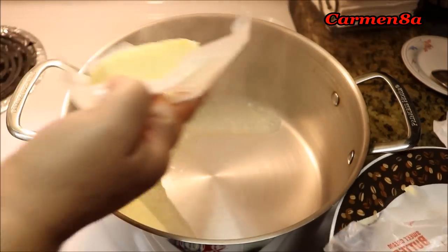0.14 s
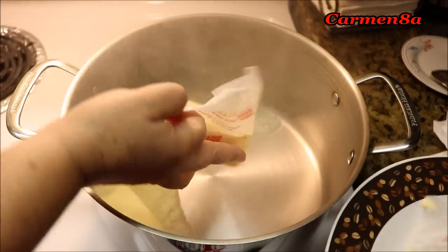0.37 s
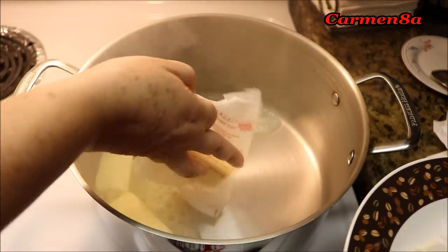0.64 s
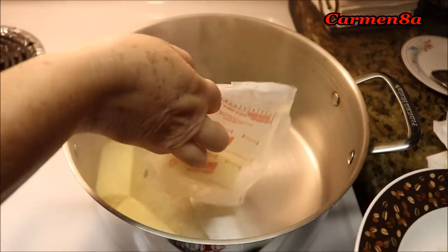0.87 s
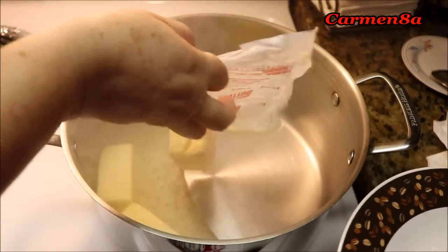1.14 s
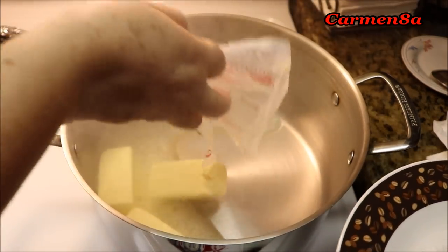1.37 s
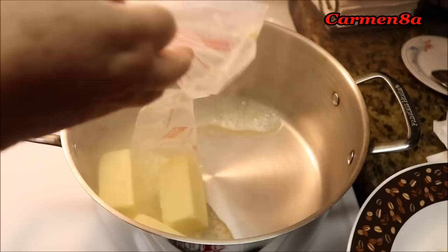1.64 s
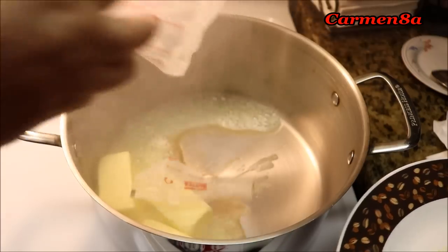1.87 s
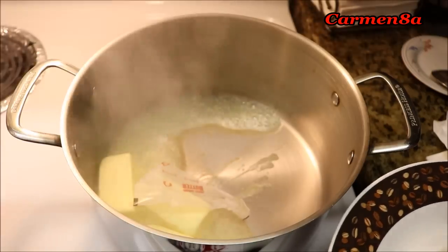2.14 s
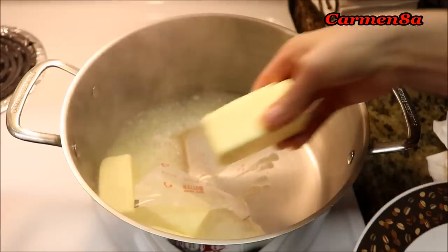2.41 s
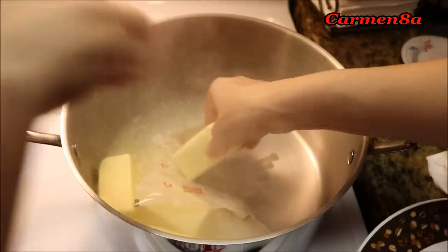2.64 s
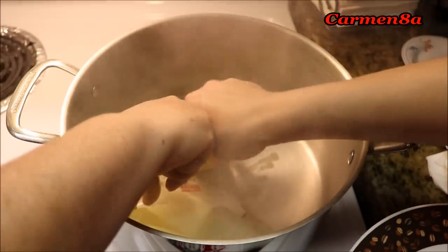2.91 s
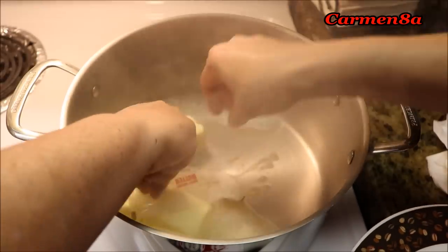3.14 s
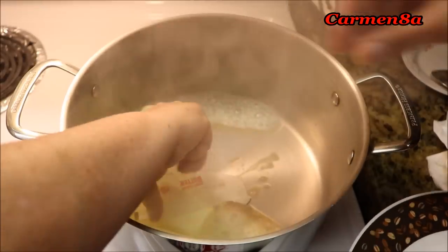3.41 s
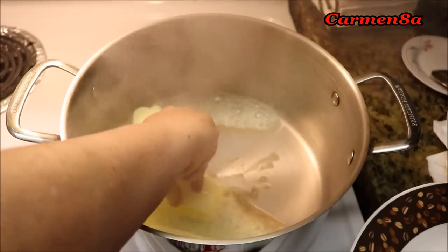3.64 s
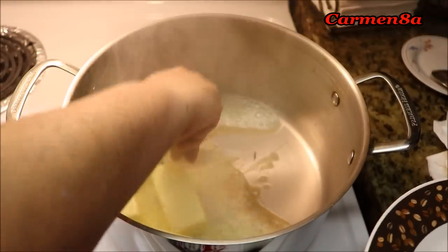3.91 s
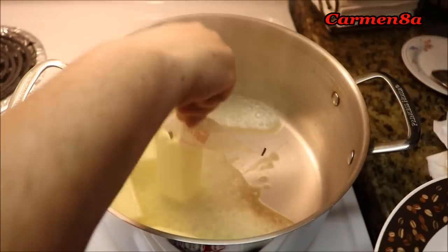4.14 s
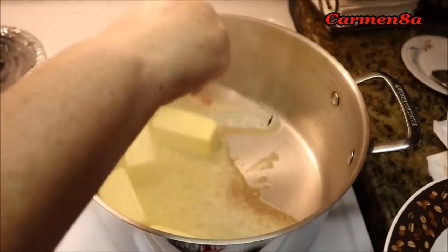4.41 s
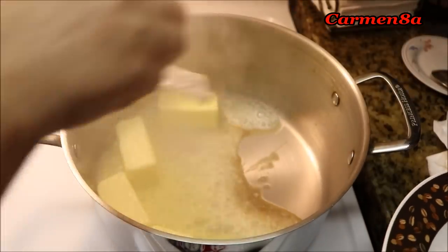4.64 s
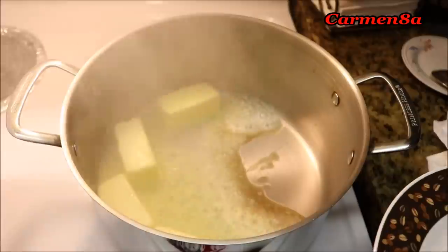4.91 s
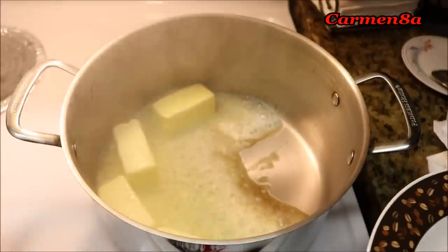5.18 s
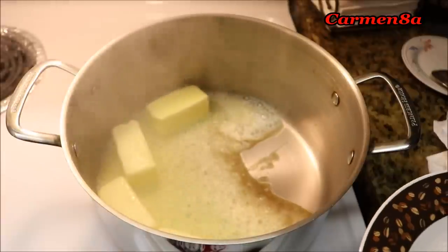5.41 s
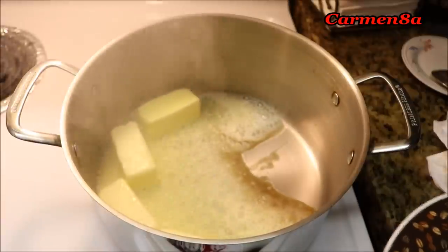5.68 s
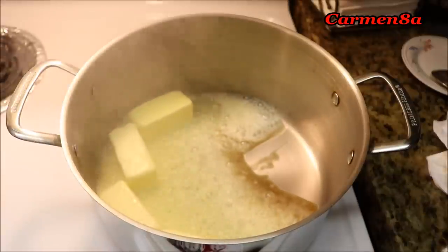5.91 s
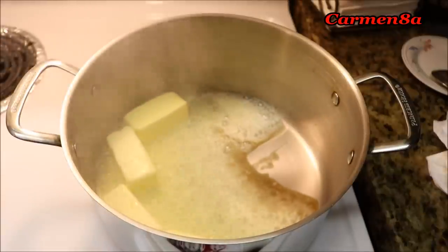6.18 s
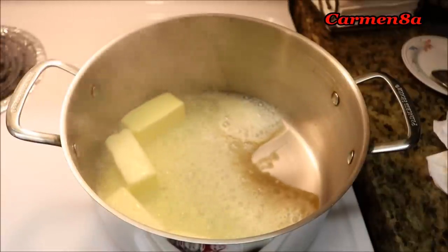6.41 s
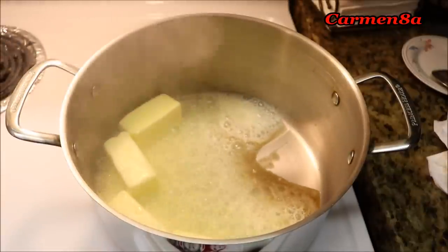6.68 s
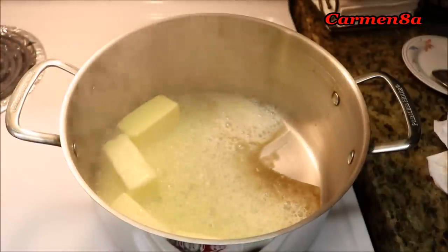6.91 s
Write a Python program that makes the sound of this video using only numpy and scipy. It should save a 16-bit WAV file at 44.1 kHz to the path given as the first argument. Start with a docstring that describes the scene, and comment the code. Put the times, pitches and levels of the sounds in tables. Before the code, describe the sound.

Close, dense frying hiss with crackling bubbles in a hollow metal pot, broken by a soft thump, a heavier clunk and sharp fat spits.

```python
"""At a stove, butter melts in a hot steel pot: steam spits in a high fizz (patchy noise bursts) over bubbling froth.
The froth makes the hollow pot hum and its walls ring faintly; bubbles, spits and contact cracks are short notes.
Sticks of butter and a hand bump the pot, which rings as a sum of decaying modes with a short reverberation.
Air stirs at the microphone as low noise; a gain control ducks the loudest thud."""
import sys
import numpy as np
from scipy import signal
from scipy.fft import rfft, irfft, next_fast_len
from scipy.io import wavfile
from scipy.ndimage import uniform_filter1d, minimum_filter1d, map_coordinates

SR = 44100
rng = np.random.default_rng(int(sys.argv[2]) if len(sys.argv) > 2 else 0)


def transcribe(signal):
    """Save signal, clipped to [-1, 1], as a 16-bit WAV file at the path in sys.argv[1]."""
    frames = np.atleast_2d(signal).T
    limited = np.clip(frames, -1, 1)
    pcm = np.round(limited * 32767).astype(np.int16)
    wavfile.write(sys.argv[1], SR, pcm)


def natural_amplitude(level_db):
    """Convert a level in decibels to a linear amplitude factor, elementwise."""
    exponent = np.asarray(level_db, float) / 20
    return 10 ** exponent


N = 310905


def unit(x):
    """Scale to rms 1."""
    return x / np.sqrt(np.mean(x ** 2) + 1e-20)


def along(points, hz):
    """Read (f/Hz, value) points on a log frequency axis."""
    f, v = np.transpose(points)
    return np.interp(np.log(hz + 1), np.log(f + 1), v)


def spectrum(points):
    """Amplitude response through (f/Hz, level/dB) points."""
    return lambda hz: natural_amplitude(along(points, hz))


def curves(rows):
    """One value per sample for each column after the time."""
    s, *cols = np.transpose(rows)
    return [np.interp(np.arange(N) / SR, s, c) for c in cols]


def wobble(rate_hz):
    """Smooth random curve, rate_hz knots a second."""
    knots = rng.standard_normal(int(N * rate_hz / SR) + 4)
    return map_coordinates(knots, [np.arange(N) * rate_hz / SR])


def swells(rows):
    """Sum of bell-shaped swells (t/s, height, rise/s, fall/s)."""
    t = np.arange(N) / SR
    return sum(height * np.exp(-((t - s) / np.where(t < s, rise, fall)) ** 2) for s, height, rise, fall in rows)


def filtered(x, response):
    """x times a response of frequency."""
    m = next_fast_len(N + SR // 5)
    return irfft(rfft(x, m) * response(np.fft.rfftfreq(m, 1 / SR)), m)[..., :N]


def highpass(hz, corner_hz, order):
    """Smooth low cut, zero phase."""
    return 1 / (1 + (corner_hz / (hz + 1)) ** order)


def resonances(modes):
    """Response of (f/Hz, width/Hz, level/dB) resonances; they cancel between neighbours."""
    return lambda f: sum(natural_amplitude(db) * 1j * f * w / (c * c - f * f + 1j * f * w) for c, w, db in modes)


def sides(db):
    """Left and right gains for a left-right difference."""
    return natural_amplitude(np.array([db / 2, -db / 2]))


# stereo likeness of the noise: f/Hz, left-right correlation/0-1
LIKENESS = [(40, 0.9), (150, 0.67), (380, 0.66), (600, 0.72), (950, 0.57), (2380, 0.51), (5980, 0.26),
            (15000, 0)]


def bursts(gain, scatter_db, patchy_db, size=256):
    """Stereo crowd of uneven tiny bursts at rms 1; a larger size makes its patches narrower and longer."""
    crowd = rng.standard_normal((2, N)) * natural_amplitude(scatter_db * rng.standard_normal(N))
    z = signal.stft(crowd, nperseg=size)[2]
    field = uniform_filter1d(rng.standard_normal(z.shape[1:]), size=5, axis=0)
    field = uniform_filter1d(field, size=8, axis=1)
    pair = signal.istft(z * natural_amplitude(patchy_db * unit(field)), nperseg=size)[1][:, :N]

    def mid_side(hz):
        turn = np.arccos(np.clip(along(LIKENESS, hz), 0, 1)) / 2
        return gain(hz) * np.array([np.cos(turn), np.sin(turn)])
    mid, side = filtered(pair, mid_side)
    return unit(np.array([mid + side, mid - side]))


CLIMB = 0.098  # share of the pitch gained by the envelope peak


def burst(hz, peak_cycles, t):
    """A short note: soft start, envelope peak 1 after peak_cycles, quick death, pitch climbing at first."""
    u = hz * t / np.maximum(peak_cycles, .5)
    phase = 2 * np.pi * hz * t * (1 + CLIMB * np.minimum(u, 2) / 2)
    return np.sin(phase) * u * np.exp(1 - u)


# hands and paper fan air at the microphone: t/s, level/dB, rise/s, fall/s
AIR_PUFFS = [(.08, -65, .08, 0.041), (.55, -65, 0.35, 0.54), (1.38, -57.5, 0.05, 0.23),
             (1.9, -67, 0.056, .05), (2.4, -64, 0.44, 0.16), (2.7, -61, .05, 0.11),
             (2.92, -50, 0.028, 0.067), (3.12, -61, 0.16, 0.14), (3.6, -57, 0.095, 0.21),
             (4.16, -69, 0.046, .04), (4.38, -54, 0.071, 0.23), (6.05, -64, 0.11, 0.16),
             (6.85, -69, 0.11, 0.23)]
STILL_AIR_DB = -77


def draught():
    """Amplitude of the moving air: a still floor plus puffs."""
    return natural_amplitude(STILL_AIR_DB) + swells([(s, natural_amplitude(db), rise, fall) for s, db, rise, fall in AIR_PUFFS])


# spectrum of moving air: f/Hz, level/dB
AIR_SPECTRUM = [(15, -34), (30, -20), (45, -11), (65, -9.5), (90, -13.5), (130, -44), (300, -90)]


def air():
    """Slow turbulence at the microphone: very low noise that follows the draught."""
    noise = bursts(spectrum(AIR_SPECTRUM), 1.0, patchy_db=2.0, size=4096)
    return draught() * natural_amplitude(3.7 * wobble(8)) * noise


# spectrum of the rumble: f/Hz, level/dB
RUMBLE_SPECTRUM = [(30, -60), (60, -20), (100, 2.5), (170, 3), (210, -23), (300, -5), (420, -3.5),
                   (600, -37), (1200, -90)]
RUMBLE_DB, RUMBLE_CHILLS_DB_PER_DB, RUMBLE_STIRRED = -63.5, 2.1, 0.9
RUMBLE_GROWS_DB, RUMBLE_GROWS_S = 2.5, 1.1  # weaker at first


def rumble():
    """Low noise that weakens as the froth chills and rises with the draught."""
    t = np.arange(N) / SR
    shy_db = RUMBLE_GROWS_DB / (1 + np.exp((t - RUMBLE_GROWS_S) / 0.16))
    level = natural_amplitude(RUMBLE_DB - RUMBLE_CHILLS_DB_PER_DB * swells(BUTTER_CHILLS) - shy_db)
    level = level + RUMBLE_STIRRED * draught()
    return level * natural_amplitude(5.5 * wobble(8.1)) * bursts(spectrum(RUMBLE_SPECTRUM), 0.56, patchy_db=-2.3, size=4096)


BASE_HZ, BASE_WIDTH_HZ, BASE_DB = 235.4, 9, -59
BASE_DAMPED_S, BASE_DAMPED_DB = 3.6, 28


def base_drone():
    """The pot's base drones as one narrow resonance until butter is pressed onto it."""
    t = np.arange(N) / SR
    damped_db = BASE_DAMPED_DB / (1 + np.exp((BASE_DAMPED_S - t) / .1))
    base_db = BASE_DB - damped_db + 4.1 * wobble(4.52)
    return natural_amplitude(base_db) * bursts(resonances([(BASE_HZ, BASE_WIDTH_HZ, 0)]), 0.62, patchy_db=0.0, size=4096)


WALL_DB, WALL_DAMPED_DB_PER_S = -47, 1.3


def wall_ring():
    """Bubbling keeps the longer pot modes faintly ringing; the spreading fat damps the walls."""
    wall_db = WALL_DB - WALL_DAMPED_DB_PER_S * np.arange(N) / SR
    modes = [(hz, np.log(1000) / np.pi / t60, db) for hz, db, t60 in POT_MODES if t60 > .18]  # width from t60
    return natural_amplitude(wall_db) * bursts(resonances(modes), 0.92, patchy_db=3.0, size=2048)


# air inside the pot and its damped base: f/Hz, width/Hz, level/dB
POT_HOLLOW = [(358, 620, -4.5), (469, 17, -0.5), (570, 23, -4), (929, 120, 1.5), (1337, 256, 3)]
HUM_DB, HUM_UPPER_DB = -39.5, 2
HUM_FLARES_DB_PER_DB, HUM_CHILLS_DB_PER_DB, UPPER_FROTH_DB_PER_DB = 0.83, 1.04, 0.32


def hum():
    """Bubbling shakes the hollow pot: noise through its resonances, the upper ones following the froth."""
    hum_db = HUM_DB + HUM_FLARES_DB_PER_DB * swells(STEEL_FLARES) - HUM_CHILLS_DB_PER_DB * swells(BUTTER_CHILLS)
    froth_db = curves(MELT_COURSE)[0]
    upper_db = HUM_UPPER_DB + UPPER_FROTH_DB_PER_DB * (froth_db - froth_db.mean())

    def hollow(hz):
        lowpass = 1 / (1 + (hz / 1500) ** 4)
        return resonances(POT_HOLLOW)(hz) * lowpass * highpass(hz, 260, 4) * highpass(hz, 90, 4)
    pot = natural_amplitude(hum_db + 1.28 * wobble(8)) * bursts(hollow, 2.7, patchy_db=1.85, size=1024)
    return pot + (natural_amplitude(upper_db) - 1) * filtered(pot, lambda hz: highpass(hz, 720, 8))


# pot modes: f/Hz, level/dB, t60/s
POT_MODES = [(150, 1, .06), (232, -7, .8), (275, 0, .05), (362, -19, 1.5), (470, -1, .09), (520, 1, .09),
             (576, -1, .3), (598, -8, .25), (727, -30, .3), (911, 0, 1.4), (935, -14, .15), (1000, 4, .1),
             (1314, -3, .3), (1370, 2, .65), (1602, -2, .28), (1982, -4, .4)]
# bumps: t/s, level/dB, favoured f/Hz, spread/octaves, t60/s left by what rests on the pot
POT_BUMPS = [(.021, -26, 1310, 0.56, 1.5), (0.1365, -24.5, 1060, 0.77, 1.7), (1.783, -8, 570, 0.032, 0.1),
             (1.838, -16.5, 578, 0.058, 0.1), (2.902, -7.5, 444, 0.6, 0.73),
             (2.9095, 1.5, 530, 0.225, 0.061), (2.939, -24, 590, 0.11, .1), (2.9575, -9, 600, 0.1, 0.12),
             (3.516, -17, 463, 0.11, 0.38), (3.735, -29, 575, 0.12, 0.34), (4.428, -28, 1200, 1.7, .05),
             (4.44, -23, 475, 0.45, 0.1)]
RISE_S, SOFTER = 0.0017, 0.59  # rise at one octave of spread, exponent
CRACK_DB, CRACK_T60_S = -2, .03  # at one octave of spread, against the bump
STOPPED_S, STOP_S = 0.3, 0.013


def bumps():
    """Each contact rings the modes near its favoured pitch: soft butter low, a knuckle high; softer rises slower."""
    out, t = np.zeros((2, N + SR)), np.arange(SR // 2) / SR
    for s, db, hz, octaves, held_t60 in POT_BUMPS:
        rise_s = RISE_S / octaves ** SOFTER
        ring = np.zeros(len(t))
        for mode_hz, level_db, t60 in POT_MODES:
            favour_db = -8 * (np.log2(mode_hz / hz) / octaves) ** 2
            ring += natural_amplitude(level_db + favour_db - 60 * t / t60) * np.sin(2 * np.pi * mode_hz * t)
        crack = octaves * natural_amplitude(CRACK_DB - 60 * t / CRACK_T60_S) * rng.standard_normal(len(t))
        blow = natural_amplitude(db - 60 * t / held_t60) * (ring + crack) * (1 - np.exp(-t / rise_s)) ** 2
        pan = sides(-2.4 * np.log2(hz / 520))[:, None]  # high contacts favour the right
        out[:, round(s * SR):][:, :len(t)] += blow * pan
    t = np.arange(N) / SR
    stopped = np.exp(-np.maximum(t - STOPPED_S, 0) / STOP_S) + (t > 1)  # a hand on the rim stops the opening ring
    return out[:, :N] * stopped


# spits of fat, and the crack of contacts as the pot is bumped: t/s, envelope peak/dB, f/Hz, time to peak/cycles
SHARP_BURSTS = [(1.3095, -21, 3300, 12), (2.9025, -14, 6000, 1), (2.9562, -21, 6600, 4),
                (3.343, -1.5, 9200, 0.79), (3.354, -15, 9500, 3), (3.4945, -14, 11500, 4),
                (4.404, -24, 2580, 3), (4.429, -25, 1350, 3), (4.43, -19, 2700, 3),
                (4.4345, -21, 1800, 2.8), (4.454, -20, 5760, 9.5), (4.908, -23, 2600, 4),
                (5.502, -20, 9000, 2), (5.515, -23, 7000, 3.6), (5.837, -17, 7460, 10),
                (6.472, -17, 7700, 4)]


def sharp_bursts():
    """Sharp short bursts, each a climbing note: spits of fat, and the crack of contacts as the pot is bumped."""
    out, t = np.zeros(N), np.arange(1000) / SR
    for s, db, hz, cycles in SHARP_BURSTS:
        out[round(s * SR):][:len(t)] += natural_amplitude(db) * burst(hz, cycles, t)
    return out * sides(-1.5)[:, None]


def kitchen(x):
    """Short reverberation: decaying noise, different in each channel."""
    t = np.arange(SR // 4) / SR
    tail = rng.standard_normal((2, len(t))) * natural_amplitude(-60 * t / 0.31)
    return signal.fftconvolve(x, tail / np.linalg.norm(tail[0]), axes=1)[:, :N]


# bubbles out of the froth: rate/Hz, middle f/Hz, spread/octaves, time to peak/cycles, top level/dB, size range/dB
POP_KINDS = [(300, 2600, .3, 4, -30, 10), (330, 8000, .3, 2, -29, 12)]


def pops():
    """Scattered bubbles, each with its own pitch, size and place; low ones follow the froth, high ones the flares."""
    out, k = np.zeros((2, N + 512)), np.arange(512)
    froth_db, _, pan_db = curves(MELT_COURSE)
    drives_db = [froth_db - froth_db.mean(), swells(STEEL_FLARES)]
    for (rate, hz, octaves, cycles, db, range_db), drive_db in zip(POP_KINDS, drives_db):
        when, size = rng.random((2, 2400))[:, :int(rate * N / SR)]
        pitch, place = rng.standard_normal((2, 2400))[:, :len(when)]
        start = (when * N).astype(int)
        level = natural_amplitude(db + drive_db[start] - range_db * size)
        note_hz = np.minimum(hz * 2 ** (octaves * pitch), 13000)
        notes = level[:, None] * burst(note_hz[:, None], cycles, k / SR)
        index = (start[:, None] + k).ravel()
        for channel, gain in enumerate(sides(pan_db[start] + 4 * place)):
            out[channel] += np.bincount(index, (gain[:, None] * notes).ravel(), N + 512)
    return out[:, :N]


# bubble spectra: f/Hz, level/dB
SMALL_BUBBLES = [(300, -94), (900, -16), (1500, -10.5), (2400, -3), (3300, 1.5), (4200, -2), (5000, -14),
                 (6500, -42)]
LARGE_BUBBLES = [(250, -90), (700, -43), (1100, -22.5), (1500, -4), (1900, 0), (2100, 3.5), (2300, 0.5),
                 (2500, -2), (2850, 0), (3600, -14.5), (5000, -52)]
SMALL_DB, SMALL_FLARES_DB_PER_DB = -28, 0.18


def froth(surge):
    """Small and large bubbles as two bands of noise bursts; chilling quiets the small ones."""
    large_db = curves(MELT_COURSE)[0]
    small_db = SMALL_DB + SMALL_FLARES_DB_PER_DB * swells(STEEL_FLARES) - swells(BUTTER_CHILLS)
    small = bursts(spectrum(SMALL_BUBBLES), 3.45, patchy_db=0.77)
    large = bursts(spectrum(LARGE_BUBBLES), 3.3, patchy_db=-0.1, size=512)
    small = natural_amplitude(small_db + 0.36 * surge + 0.27 * wobble(4.02)) * small
    large = natural_amplitude(large_db + 0.32 * surge + 0.4 * wobble(4.18)) * large
    return small + large


# steam spectrum: f/Hz, level/dB
STEAM_SPECTRUM = [(1200, -90), (2650, -11), (4500, -5), (5440, -3), (6550, 0.5), (9220, 0), (12000, -4),
                  (15100, -9.5), (16200, -13.5)]
FIZZ_DB, FIZZ_FADES_DB_PER_S, FIZZ_CHILLS_DB_PER_DB = -21.5, 0.25, 0.36
FLARE_BRIGHTENS_DB_PER_DB = 0.18


def fizz(surge):
    """Steam as fine high noise bursts; flares brighten it, deeper fat smothers the finest hiss."""
    bright_db, flare_db = curves(MELT_COURSE)[1], swells(STEEL_FLARES)
    fizz_db = FIZZ_DB - FIZZ_FADES_DB_PER_S * np.arange(N) / SR + flare_db
    fizz_db = fizz_db - FIZZ_CHILLS_DB_PER_DB * swells(BUTTER_CHILLS)
    steam = bursts(spectrum(STEAM_SPECTRUM), 2.1, patchy_db=1.03)
    top = filtered(steam, lambda hz: np.clip(np.log2(hz / 8000 + 1e-9), 0, 1))
    steam = steam + (natural_amplitude(bright_db + FLARE_BRIGHTENS_DB_PER_DB * flare_db) - 1) * top
    return natural_amplitude(fizz_db + 0.74 * surge + 0.1 * wobble(13)) * steam


# the melt: t/s, large-bubble level/dB, fizz gain at 16 kHz (fades out by 8 kHz)/dB, fizz left-right/dB
MELT_COURSE = [(0, -32.5, -0.5, -0.5), (.5, -37.5, 4.5, -1), (1.1, -32.5, 2.5, -1.2),
               (1.7, -30.5, 1.5, -1.2), (2.8, -30, 3.5, -0.5), (3.7, -30.5, 3.5, -1), (4.4, -31, 4.5, -2.5),
               (4.6, -34, 4, -3), (5.05, -28.5, 2, -2), (5.5, -30, -2, -2), (6.1, -27.5, -0.5, -1.5),
               (7.05, -26.5, -6.5, -2)]
# cold butter chills the froth: t/s, depth/dB, rise/s, fall/s
BUTTER_CHILLS = [(.3, 1.5, 0.06, 0.1), (4.65, 5, 0.12, 0.57), (5.35, 0.5, 0.06, 0.093)]
# butter meets bare hot steel, the sizzle flares: t/s, gain/dB, rise/s, fall/s
STEEL_FLARES = [(.14, 1.5, 0.035, .06), (1.31, 2, 0.05, 0.046), (1.81, 2, 0.032, 0.029),
                (2.1, 1, 0.074, 0.44), (2.97, 1.5, 0.021, 0.025), (3.5, 0.5, 0.3, 0.1),
                (3.8, 3.5, 0.065, 0.14), (4.48, 3.5, 0.06, 0.41), (6.0, 1, 0.28, 0.11),
                (6.85, 1, 0.16, 0.091)]


def sizzle():
    """Steam fizz over froth; the boil surges in both together."""
    pan_db, surge = curves(MELT_COURSE)[2], wobble(13)
    return fizz(surge) * sides(pan_db) + froth(surge) * sides(pan_db - 2.5)


# gaps between pot resonances, moved by hands and butter: t/s, lower f/Hz, lower cut/dB, upper cut/dB (below 0 lifts)
POT_GAPS = [(0, 706, -14, -7), (.25, 744, 6, -3), (.6, 750, 3, 16), (1.1, 740, 2, 4), (1.35, 700, -2, -3),
            (1.75, 684, 6, -5), (2.1, 710, 9, -3), (2.4, 716, 17, -4), (2.7, 690, 1, -3),
            (2.95, 740, -7, 1), (3.4, 710, -1, -1), (4, 806, 7, 3), (4.4, 810, 5, -3), (4.6, 820, 8, -2),
            (5, 810, 10, -4), (5.349, 840, 10, 0), (6.3, 844, 6, -1), (7.05, 760, 6, -1)]
UPPER_GAP_HZ, LOWER_WIDTH_HZ, UPPER_WIDTH_HZ = 1080, 60, 65


def gapped(x):
    """Two gaps in the low sizzle: the lower drifts, both deepen and fill again."""
    hz, t, z = signal.stft(x, SR, nperseg=2048)
    s, *cols = np.transpose(POT_GAPS)
    lower_hz, lower_db, upper_db = (np.interp(t, s, c) for c in cols)
    bell = lambda centre, width: np.exp(-((hz[:, None] - centre) / width) ** 2)
    cut_db = lower_db * bell(lower_hz, LOWER_WIDTH_HZ) + upper_db * bell(UPPER_GAP_HZ, UPPER_WIDTH_HZ)
    return signal.istft(z * natural_amplitude(-cut_db), SR, nperseg=2048)[1][:, :N]


def scene():
    """Gapped boil, plus the bumps and sharp bursts with their room."""
    boil = sizzle() + pops() + hum() + wall_ring() + base_drone() + rumble() + air()
    knocks = bumps() + sharp_bursts()
    room = natural_amplitude(-14) * kitchen(knocks)
    return gapped(boil) + knocks + room


def band_limit(x):
    """A steep low-pass at the top of the band."""
    return signal.sosfilt(signal.butter(12, 17060, fs=SR, output="sos"), x)


TOP_HZ, THRESHOLD_DB, CUT_DB_PER_DB = 15900, -15.8, 1.2


def record(dry):
    """Gain control turns down after a loud moment, holds briefly and lets go; the treble ends at TOP_HZ."""
    window, hold = round(0.012 * SR), round(0.026 * SR)
    power = uniform_filter1d(np.mean(dry ** 2, axis=0), window, origin=(window - 1) // 2)  # trailing window
    over_db = np.maximum(10 * np.log10(np.abs(power) + 1e-12) - THRESHOLD_DB, 0)
    cut_db = minimum_filter1d(-CUT_DB_PER_DB * over_db, hold, origin=(hold - 1) // 2)
    ducked = dry * natural_amplitude(uniform_filter1d(cut_db, window // 2))
    mix = filtered(ducked, lambda hz: hz < TOP_HZ)
    return band_limit(mix)


dry = scene()
out = record(dry)
transcribe(out)
```